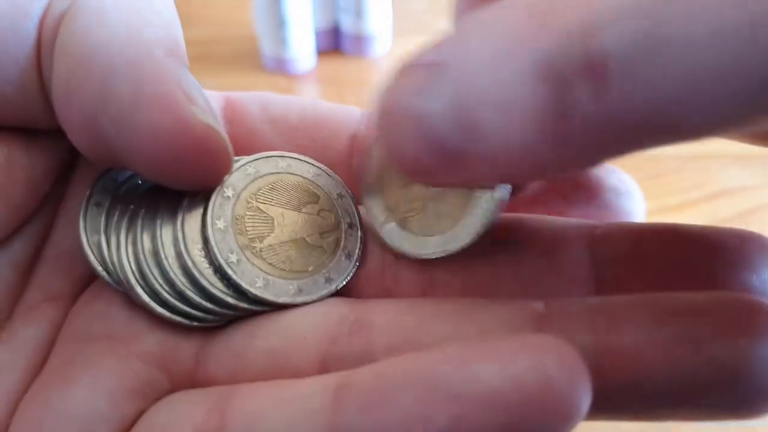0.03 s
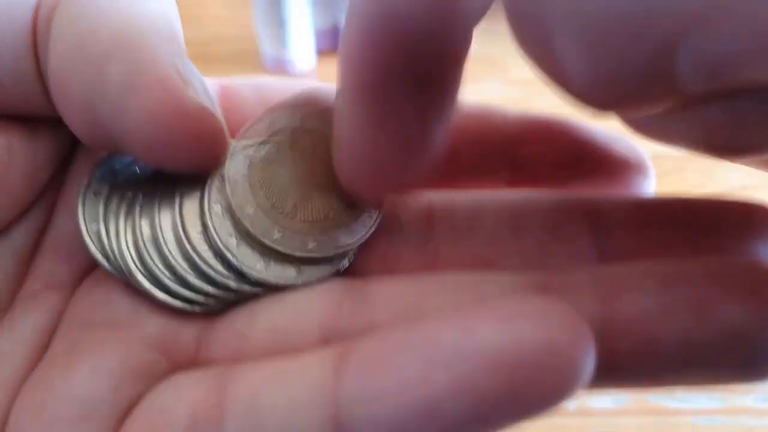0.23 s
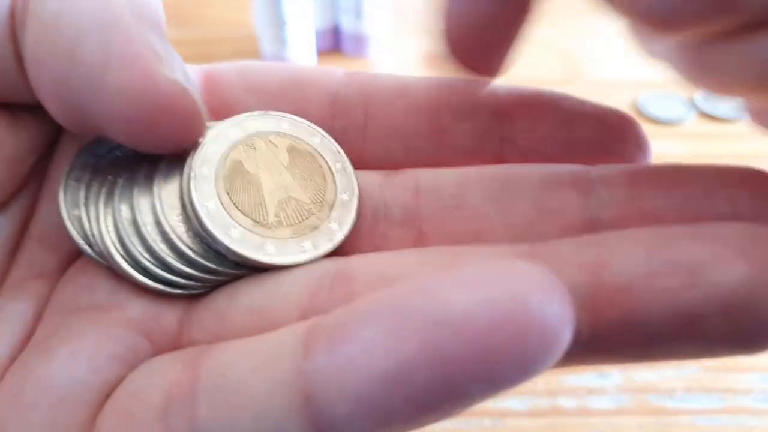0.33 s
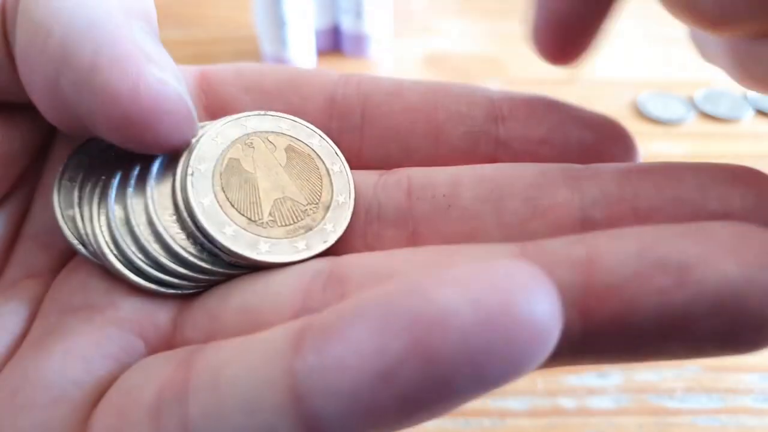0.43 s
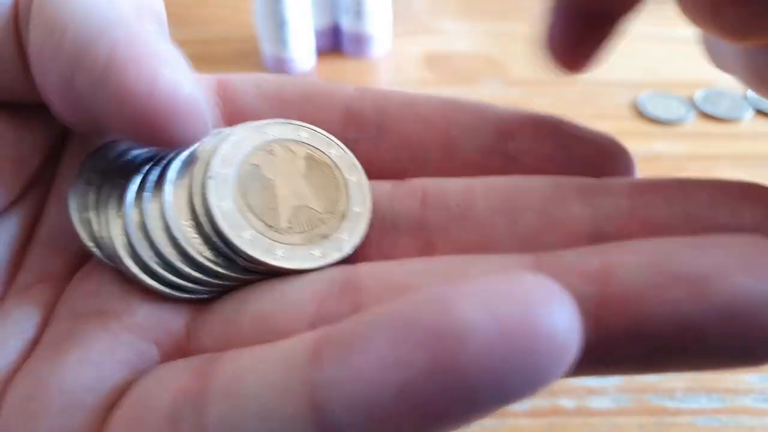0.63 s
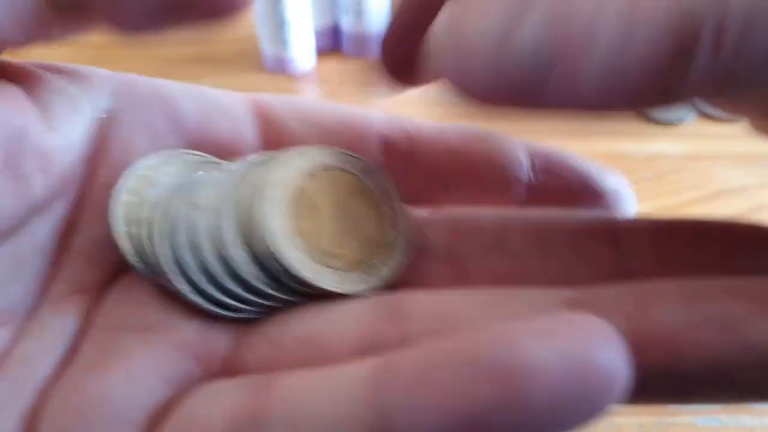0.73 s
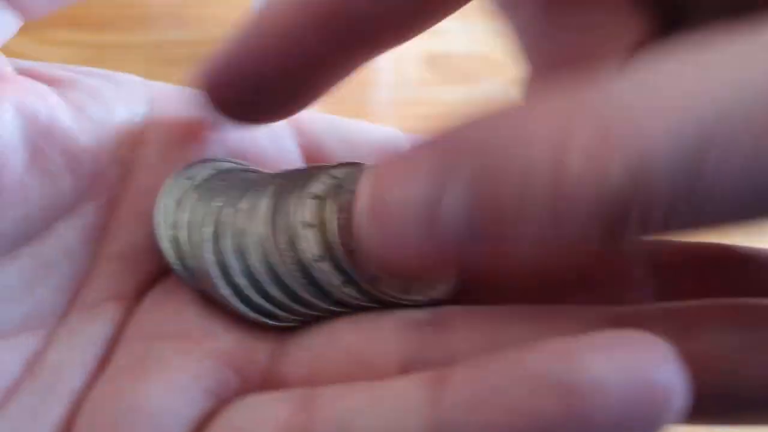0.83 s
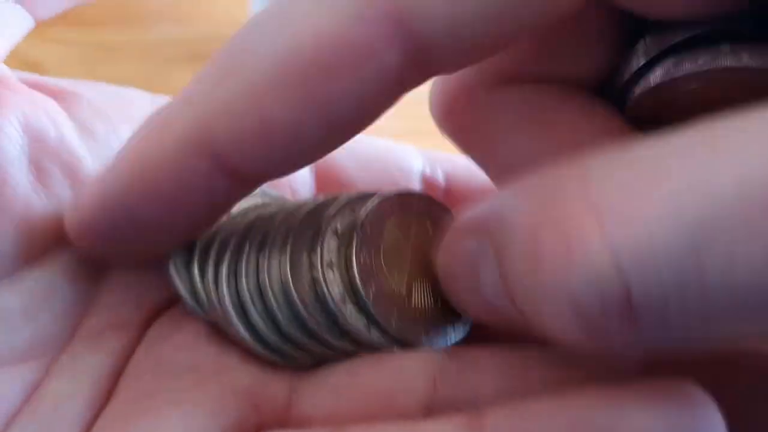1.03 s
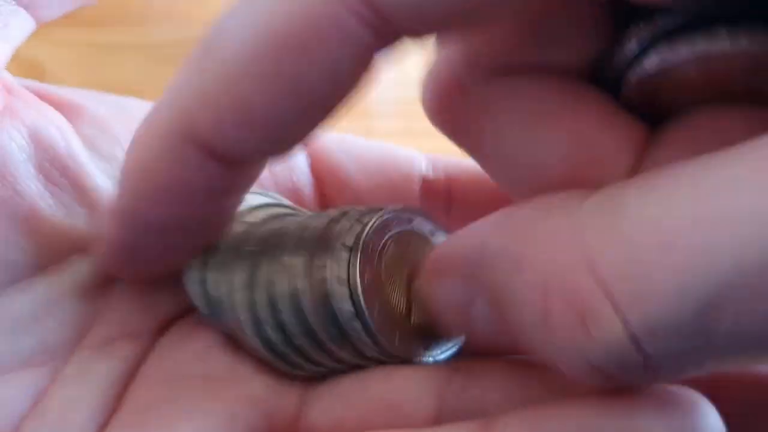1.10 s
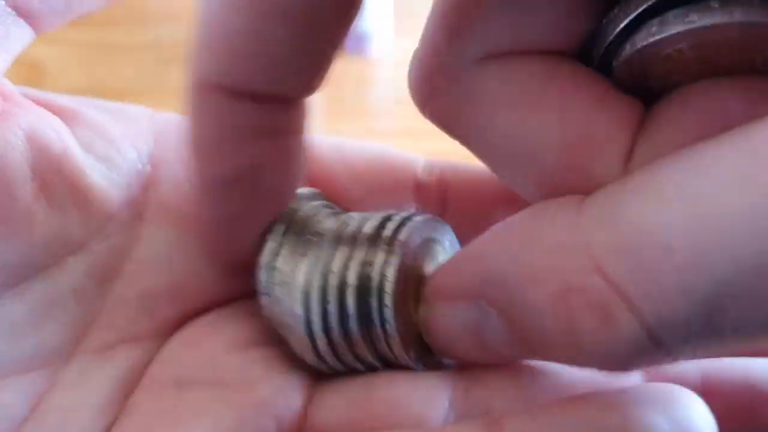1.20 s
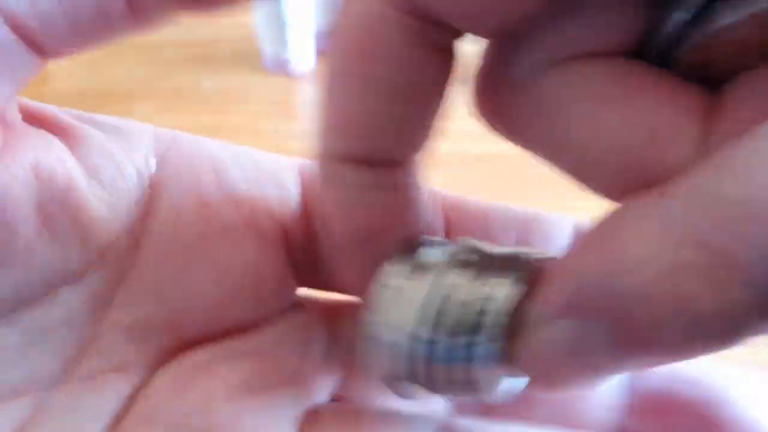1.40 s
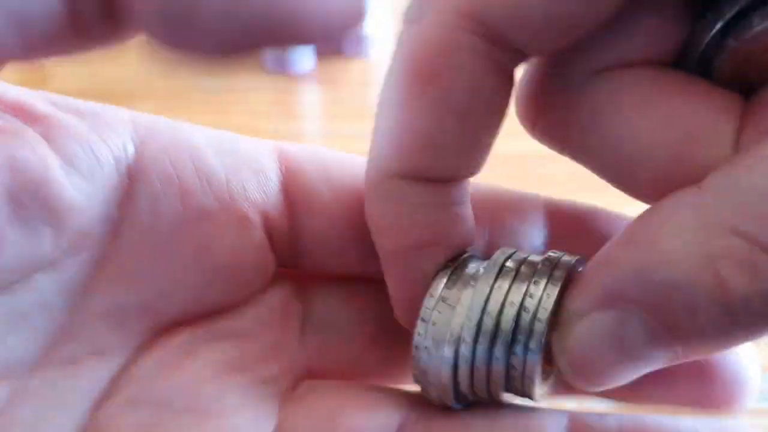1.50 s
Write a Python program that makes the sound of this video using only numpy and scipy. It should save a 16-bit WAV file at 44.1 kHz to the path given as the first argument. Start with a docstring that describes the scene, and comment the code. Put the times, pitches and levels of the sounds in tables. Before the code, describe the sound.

Metal coins clink close up in a palm. Light ticks lead to a bright, briefly ringing rattle at about 0.2 seconds and another at 0.3. After a pause, a faint scrape ends in a clink near 0.85 seconds. Small damped clicks follow, with a sharp clack at about 1.25 as the stack closes, then a faint sliding hiss. Soft skin rubbing and a low room rumble lie underneath.

```python
"""A small room, close up on a palm: a coin is slid onto a row of coins, and the row is pushed into a stack.
Skin rubs softly over a low, steady rumble. Each clink chatters for a few milliseconds and rings the
hand-damped coins; a coin that lies loose rings longer. Milled rims scrape between the clinks, the hardest
knocks thud into the palm, and the room adds a short tail. The closed stack slides with a soft hiss."""
import sys
import numpy as np
from scipy import signal
from scipy.fft import rfft, irfft
from scipy.io import wavfile

SR = 44100
rng = np.random.default_rng(int(sys.argv[2]) if len(sys.argv) > 2 else 0)


def unload_wav(signal):
    """Save mono or channel-first audio to the path in sys.argv[1] as 16-bit WAV at rate SR, clipped to [-1, 1]."""
    wavfile.write(
        sys.argv[1],
        SR,
        np.round(np.clip(np.atleast_2d(signal).T, -1, 1) * 32767).astype(np.int16),
    )


N = 68355
EVENT_SAMPLES = 16384

# room rumble, two humps in the bass: frequency_hz, gain_db
RUMBLE_COLOUR = [(25, -14.5), (45, -5), (68, 3), (88, -11), (108, -1), (135, -14), (290, -12), (400, -30.5),
                 (600, -22), (1200, -30.5), (2000, -46.5), (4000, -58), (15000, -63)]
# skin rubbing as the hands move: time_s, level_db
RUB_LEVELS = [(0, -69.5), (.3, -59), (.55, -76.5), (.78, -76), (.9, -65), (1.1, -61.5), (1.33, -58.5),
              (1.55, -66.5)]
# dull tone of that rub: frequency_hz, gain_db
SKIN_COLOUR = [(100, -4.5), (280, -4), (430, -8), (1200, -10.5), (2500, -18), (8000, -28.5)]
# modes of the loose top coin: pitch_hz, level_db
LOOSE_MODES = [(3943, -6.5), (5770, -6.5), (8713, 1), (9014, 0.5), (9708, 0), (10194, -1), (11943, 1.5),
               (14350, -4.5)]
# its ring in each contact, freest as it drops, choked once the row is gripped: time_s, gain_db
LOOSE_RING = [(.19, -19.5), (.225, -8), (.3, -27)]
# ring of the coin underneath, choked while the top coin rattles on it: time_s, gain_db
UNDER_RING = [(.14, -13.5), (.225, -26), (.32, -14)]
# bright crack of bare metal on metal: frequency_hz, gain_db
CRACK_COLOUR = [(300, -31), (1500, -25.5), (3000, -11.5), (4100, -1.5), (6500, 1), (9000, -5.5),
                (13500, -1.5), (15800, -8)]
# coin knocks on coin: start_s, level_db, tilt_db_per_octave, pan_left_db, pitch_hz, ring_over_crack_db
COIN_KNOCKS = [(0.0601, -32.5, -7.5, 10, 4295, -6), (0.0612, -35.5, -12, 6.5, 3590, -8),
               (0.095, -35, -3, 5, 4540, 10), (0.1329, -42, -6.5, 6, 3830, -5.5),
               (0.188, -46, -9.5, 8, 4650, -7), (0.2205, -18, 2.5, 6, 10200, 1),
               (0.2238, -19, -2.5, 6.5, 4660, 0), (0.2261, -10.5, 4, 7.5, 10100, -1.5),
               (0.2298, -10, 2, -6, 9010, 2), (0.2992, -30.5, -4.5, 1, 6800, 4),
               (0.3129, -25.5, 3, 6, 6200, -10), (0.3155, -17.5, -0.5, 7.5, 6300, -7),
               (0.3174, -14, 2, 7.5, 4140, -6.5), (0.3308, -23, 4, 3, 4580, -7.5),
               (0.3340, -23.5, -2, 5, 4300, -6.5), (0.8588, -24, 3, 4, 4600, 1),
               (0.868, -34.5, 1, -0.5, 6560, -6.5), (.9537, -35.5, -3.5, 4.5, 4830, 2),
               (1.003, -35.5, -0.5, 0.5, 5700, -3), (1.0177, -43.5, -11, 13, 5970, -2),
               (1.028, -47.5, -5, 4, 2170, 2), (1.0348, -31.5, 1.5, 4.5, 6930, -2.5),
               (1.1303, -31, -9, 6, 4300, 0), (1.1386, -27, -9, 10, 5800, -3.5),
               (1.1554, -32.5, -4.5, 12.5, 6900, 4), (1.219, -29, 1.5, 4.5, 4500, 3.5),
               (1.224, -33, -8, 1, 6460, -4), (1.238, -32, -7.5, 13, 6350, -1),
               (1.264, -14, 3.5, 7.5, 6840, -4), (1.267, -21.5, -0.5, -5, 7300, -4),
               (1.274, -29.5, -4, 5, 6000, 1), (1.3231, -32.5, -1, 5.5, 7940, -0.5),
               (1.5354, -45.5, -1.5, 7, 7480, 2.5)]
# rim slides over coin: start_s, swell_s, release_s, level_db, tilt_db_per_octave, pan_left_db, pitch_hz
RIM_STROKES = [(0.07, 0.0056, 0.013, -55.5, -17, 11, 5350), (0.199, 0.021, 0.008, -43, -12, -8, 4470),
               (.229, 0.012, 0.017, -25, -2.5, 2.5, 4800), (0.329, 0.0044, 0.0096, -30, -2, 6, 4260),
               (.729, 0.07, 0.015, -50, -8.5, 1, 4210), (.852, 0.0062, 0.017, -45, 1, 11, 4370),
               (1.08, 0.029, 0.023, -56, -5, 7, 4300), (1.127, 0.012, 0.012, -36, -5, 1.5, 4660),
               (1.233, 0.009, 0.013, -34.5, -3, 3, 6670), (1.257, 0.0073, 0.012, -27.5, -4, 3.5, 4460)]
# the stack knocks into the palm: start_s, level_db
PALM_KNOCKS = [(0.2258, -50), (0.2296, -42), (.3165, -58), (0.8588, -44.5), (1.264, -46.5)]
# dull body of the palm: frequency_hz, gain_db
PALM_COLOUR = [(100, -4.5), (230, 3.5), (600, 1), (1100, -5), (2500, -17.5)]
# the closed stack slides on the palm: time_s, level_db
SLIDE_LEVELS = [(1.3, -82.5), (1.38, -72.5), (1.5, -68.5), (1.55, -70.5)]
# thin hiss of that slide: frequency_hz, gain_db
HISS_COLOUR = [(1500, -15), (3000, -14), (5500, -9.5), (7400, 2), (9600, -11), (11700, -10), (15000, -22.5)]

CHATTER_T60_S, DAMPED_T60_S, NEIGHBOUR_T60_S = 0.011, 0.01, 0.018
LOOSE_T60_S, UNDER_T60_S = 0.049, 0.04
NEIGHBOUR_RANGE_HZ, NEIGHBOUR_DB = (3643, 13830), -8.5
UNDER_HZ, UNDER_GRIPPED_S = 10450, 0.5
KNOCK_GAIN = np.sqrt(SR / 1000)  # a knock's level counts its energy as if packed into 1 ms


def undb(db):
    return 10 ** (np.asarray(db) / 20)


def unit(x):
    """Unit energy in each channel."""
    return x / np.sqrt(np.sum(x ** 2, axis=-1, keepdims=True) + 1e-20)


def fade(t, t60):
    return np.exp(-np.log(1000) * t / t60)


def fader(levels, t, before_db=None):
    """Gain at time t along (time_s, level_db) points."""
    return undb(np.interp(t, *np.array(levels).T, left=before_db))


def eq_curve(points, hz):
    """Gain along (frequency_hz, gain_db) points."""
    points_hz, db = np.array(points).T
    return undb(np.interp(np.log(hz + 1), np.log(points_hz), db))


def colour(x, points):
    """Minimum-phase EQ: nothing sounds ahead of the attack."""
    cepstrum = irfft(np.log(eq_curve(points, np.fft.rfftfreq(EVENT_SAMPLES, 1 / SR))))
    cepstrum[1:EVENT_SAMPLES // 2] *= 2
    cepstrum[EVENT_SAMPLES // 2 + 1:] = 0
    return irfft(rfft(x, EVENT_SAMPLES) * np.exp(rfft(cepstrum)))


def tilted(x, db_per_octave):
    """Tip the treble above 4 kHz."""
    return colour(x, [(4000, 0), (16000, 2 * db_per_octave)])


def add(out, x, start_s):
    i = int(start_s * SR)
    n = min(x.shape[1], N - i)
    out[:, i:i + n] += x[:, :n]


def rumble(level_db=-55, wide_above_hz=775):
    """Steady room tone, centred in the bass and wider higher up."""
    hz = np.fft.rfftfreq(N, 1 / SR)
    mid, side = rfft(rng.standard_normal((2, N)))
    width = hz / np.hypot(hz, wide_above_hz)
    stereo = mid + np.array([[1], [-1]]) * width * side
    air = irfft(stereo * eq_curve(RUMBLE_COLOUR, hz), N)
    return undb(level_db) * np.sqrt(N) * unit(air)


def skin_friction(levels, tone):
    """Rubbing on skin makes a soft noise that follows the movement of the hands."""
    white = rfft(rng.standard_normal((2, N)))
    noise = irfft(white * eq_curve(tone, np.fft.rfftfreq(N, 1 / SR)), N)
    return np.sqrt(N) * unit(noise) * fader(levels, np.arange(N) / SR, before_db=-np.inf)


def ringing(modes, t60_s):
    """Struck metal rings in decaying (pitch_hz, level_db) modes, with their own phases left and right."""
    t = np.arange(EVENT_SAMPLES // 4) / SR
    ring = np.zeros((2, len(t)))
    for hz, db in modes:
        sine = np.sin(2 * np.pi * (hz * t + rng.random((2, 1))))
        ring += undb(db) * unit(fade(t, t60_s) * sine)
    return unit(ring)


def ridges(hits_per_s=4000, scatter_db=3):
    """Milled ridges make dense, tiny collisions of uneven strength, different left and right."""
    hits = rng.random(EVENT_SAMPLES) < hits_per_s / SR
    strength = undb(scatter_db * rng.standard_normal(EVENT_SAMPLES))
    return hits * strength * rng.standard_normal((2, EVENT_SAMPLES))


def coin_contact(force, start_s, loose_coin, tilt_db, pan_left_db, pitch_hz, ring_db):
    """A contact cracks and rings a damped coin, its neighbours, the loose coin and the one under it."""
    def excite(body):
        return unit(signal.fftconvolve(force, body, axes=1)[:, :EVENT_SAMPLES])
    overtone_hz = min(2.25 * pitch_hz, SR / 2)
    damped_coin = ringing([(pitch_hz, 0), (overtone_hz, -12)], DAMPED_T60_S)
    neighbours_hz = np.exp(rng.uniform(*np.log(NEIGHBOUR_RANGE_HZ), size=12))
    neighbours = ringing([(hz, 0) for hz in neighbours_hz], NEIGHBOUR_T60_S)
    under_coin = ringing([(UNDER_HZ, 0)], UNDER_T60_S)
    crack = unit(colour(force, CRACK_COLOUR))
    attack = crack + undb(ring_db) * excite(damped_coin) + undb(NEIGHBOUR_DB) * excite(neighbours)
    loose_ring = fader(LOOSE_RING, start_s) * excite(loose_coin)
    under_ring = (start_s < UNDER_GRIPPED_S) * fader(UNDER_RING, start_s) * excite(under_coin)
    pan = undb([[pan_left_db / 2], [-pan_left_db / 2]])
    return pan * unit(unit(tilted(attack, tilt_db)) + loose_ring + under_ring)


def clinks(loose_coin, touch_db=-7, right_lag_s=0.00012, chatter_rise_s=0.00027):
    """Coin meets coin: a first touch, then chatter that dies in milliseconds."""
    out, t = np.zeros((2, N)), np.arange(EVENT_SAMPLES) / SR
    touch = np.zeros((2, EVENT_SAMPLES))
    touch[0, 0] = touch[1, int(right_lag_s * SR)] = undb(touch_db)
    chatter = fade(t, CHATTER_T60_S) * (1 - np.exp(-t / chatter_rise_s))
    for start_s, level_db, *timbre in COIN_KNOCKS:
        force = touch + unit(ridges() * chatter)
        clink = coin_contact(force, start_s, loose_coin, *timbre)
        add(out, undb(level_db) * KNOCK_GAIN * clink, start_s)
    return out


def room_tail(close, level_db=-15, t60_s=0.185, build_s=0.006):
    """The small room answers with a diffuse tail, quick to build and duller than the coins."""
    t = np.arange(EVENT_SAMPLES) / SR
    tail = rng.standard_normal((2, EVENT_SAMPLES)) * fade(t, t60_s) * (1 - np.exp(-t / build_s))
    dull_tail = unit(tilted(tail, db_per_octave=-3))
    send = close.sum(axis=0, keepdims=True) / np.sqrt(2)
    return undb(level_db) * signal.fftconvolve(send, dull_tail, axes=1)[:, :N]


def rim_scrapes(loose_coin):
    """Ridges tick over an edge while the pressure swells and lets go."""
    out, t = np.zeros((2, N)), np.arange(EVENT_SAMPLES) / SR
    for start_s, swell_s, release_s, level_db, *timbre in RIM_STROKES:
        pressure = np.interp(t, [0, swell_s, swell_s + release_s], [0, 1, 0]) ** 1.01
        scrape = coin_contact(ridges() * pressure, start_s, loose_coin, *timbre, ring_db=-10)
        add(out, undb(level_db) * np.linalg.norm(pressure) * scrape, start_s)
    return out


def palm_thuds():
    """The hardest knocks carry through the stack into the palm: short, dull and dead centre."""
    out, t = np.zeros((1, N)), np.arange(EVENT_SAMPLES) / SR
    for start_s, level_db in PALM_KNOCKS:
        force = rng.standard_normal((1, EVENT_SAMPLES)) * fade(t, CHATTER_T60_S)
        thud = unit(colour(force, PALM_COLOUR))
        add(out, undb(level_db) * KNOCK_GAIN * thud, start_s)
    return out


def stack_slide():
    """The closed stack hisses as it slides over the skin of the palm."""
    return skin_friction(SLIDE_LEVELS, HISS_COLOUR)


def scene():
    """Coins up front with the room behind them, over a bed of rumble and skin noise."""
    bed = rumble() + skin_friction(RUB_LEVELS, SKIN_COLOUR) + stack_slide()
    loose_coin = ringing(LOOSE_MODES, LOOSE_T60_S)
    close = clinks(loose_coin) + rim_scrapes(loose_coin) + palm_thuds()
    return close + room_tail(close) + bed


def record(dry):
    """A steep low-pass shaves off the top above 15.5 kHz."""
    return signal.sosfilt(signal.ellip(8, 0.2, 70, 15500, fs=SR, output="sos"), dry)


dry = scene()
out = record(dry)
unload_wav(out)
```